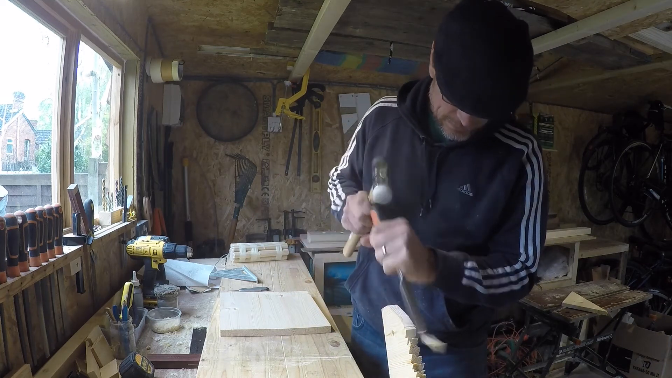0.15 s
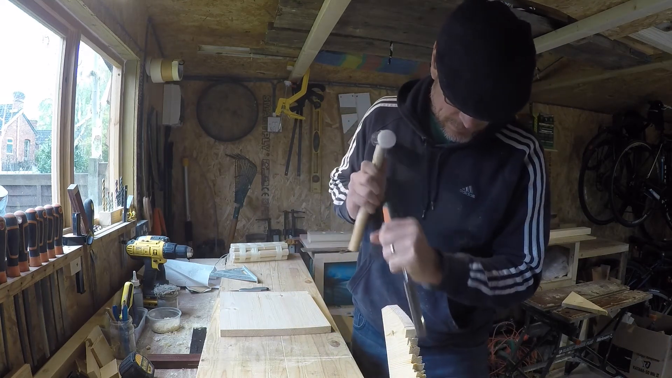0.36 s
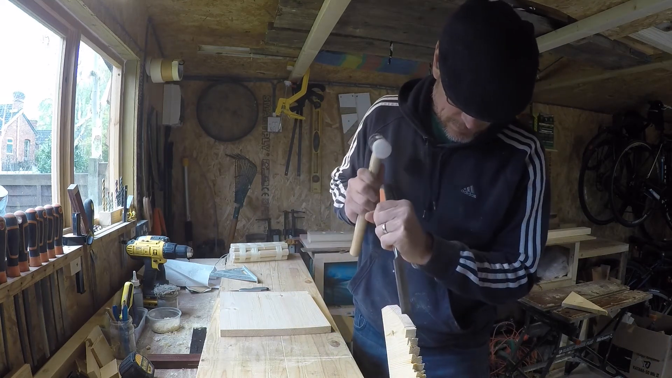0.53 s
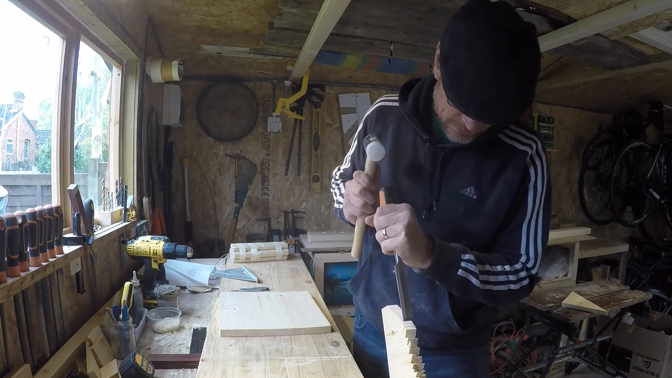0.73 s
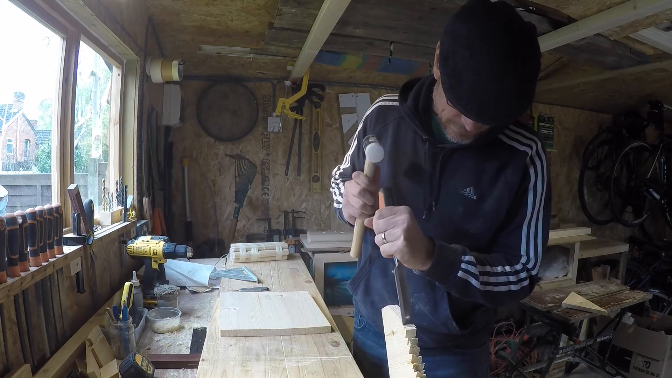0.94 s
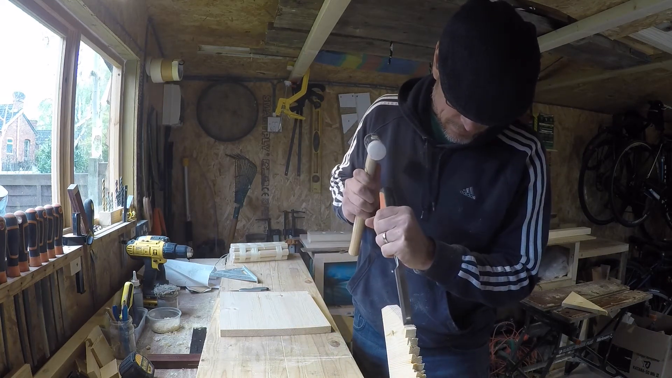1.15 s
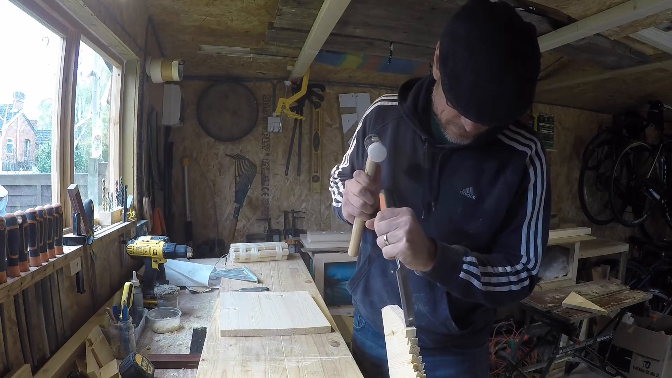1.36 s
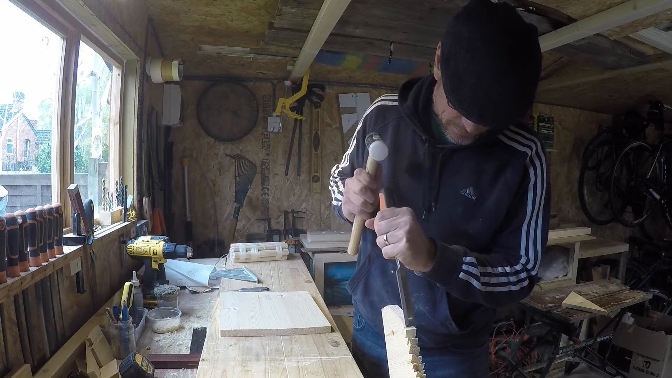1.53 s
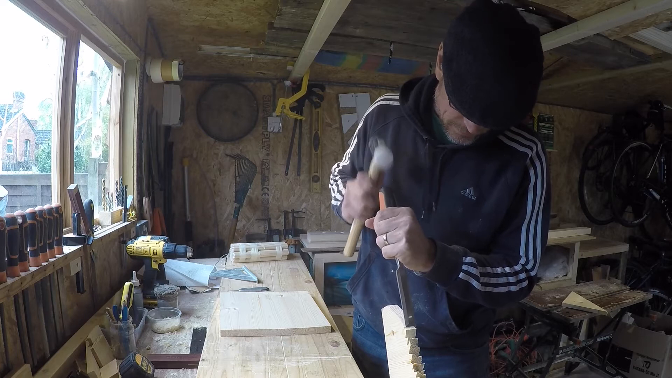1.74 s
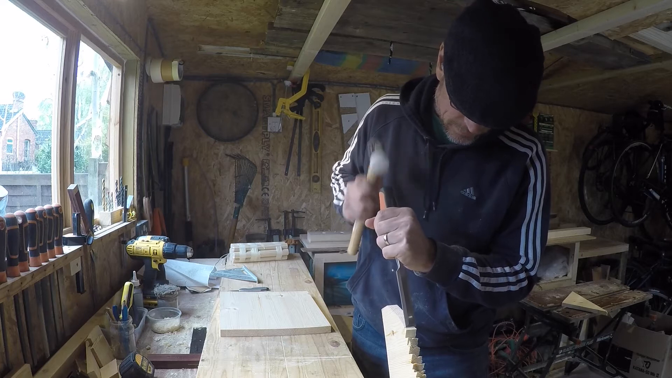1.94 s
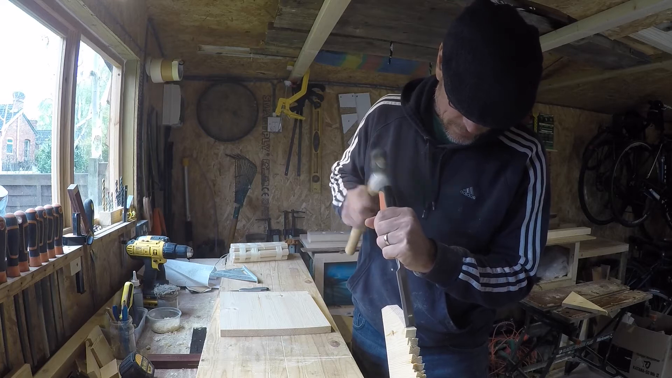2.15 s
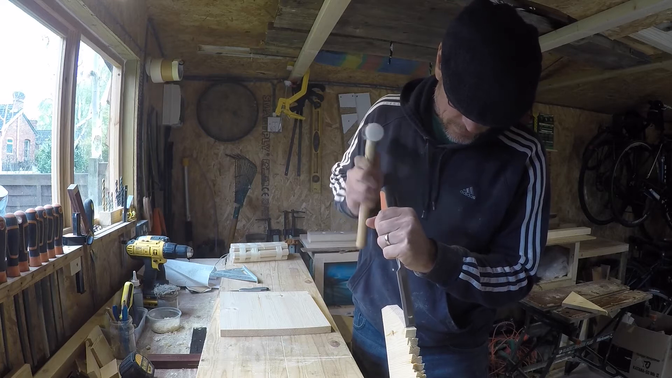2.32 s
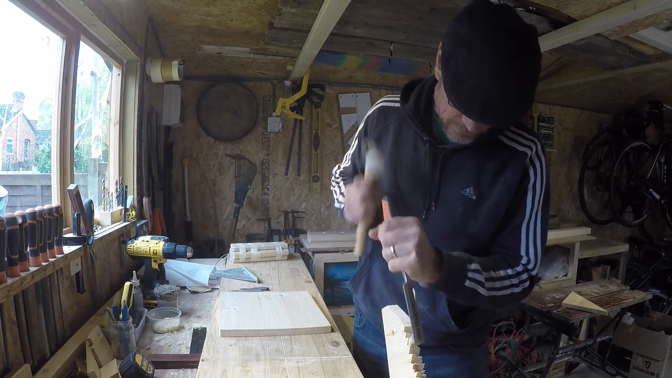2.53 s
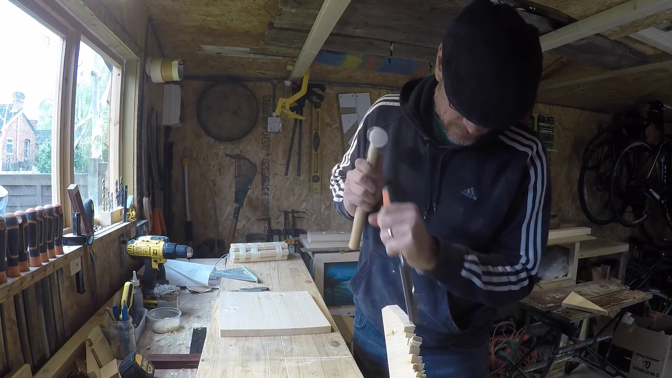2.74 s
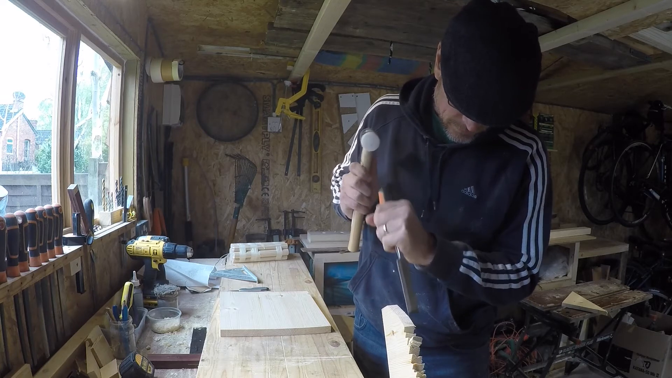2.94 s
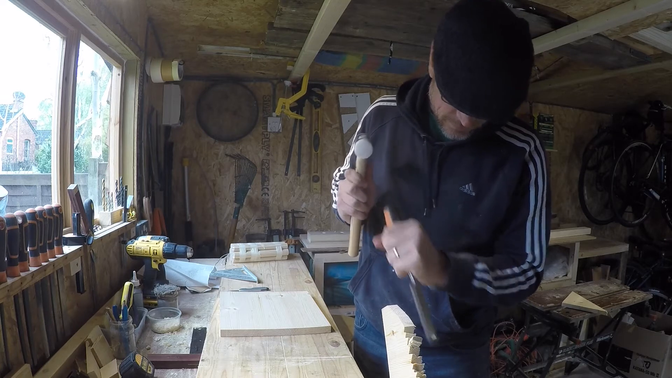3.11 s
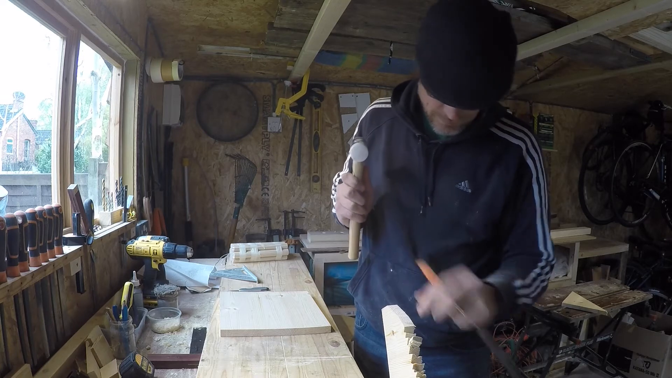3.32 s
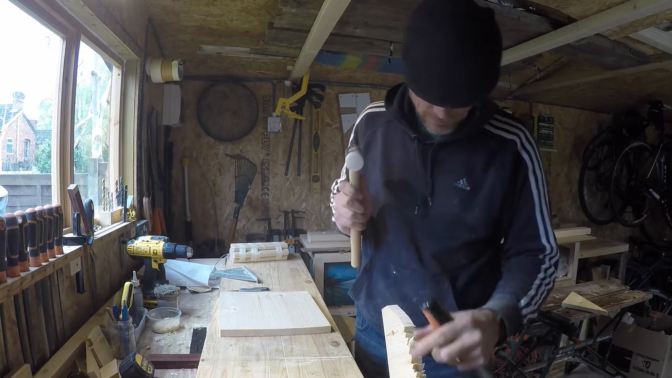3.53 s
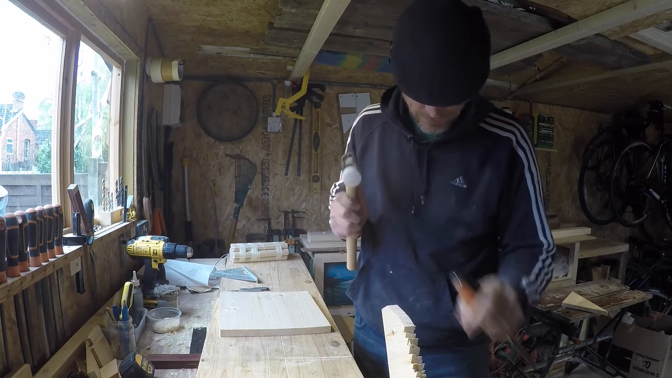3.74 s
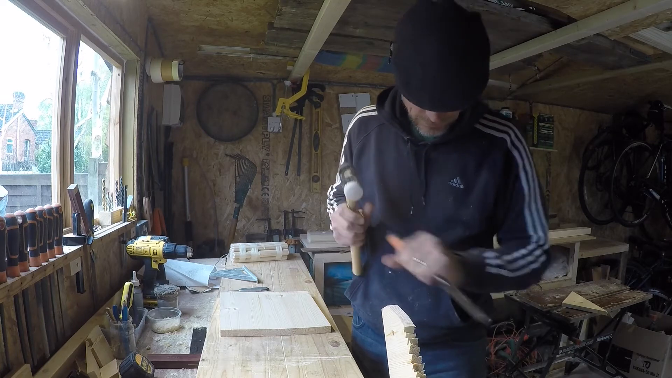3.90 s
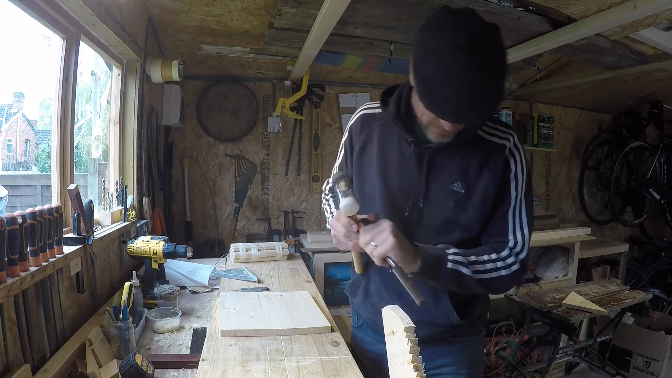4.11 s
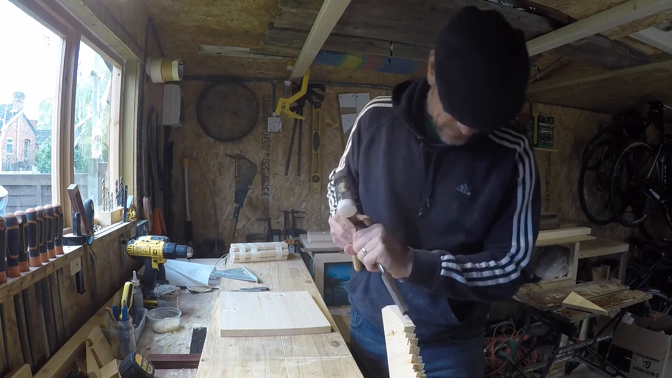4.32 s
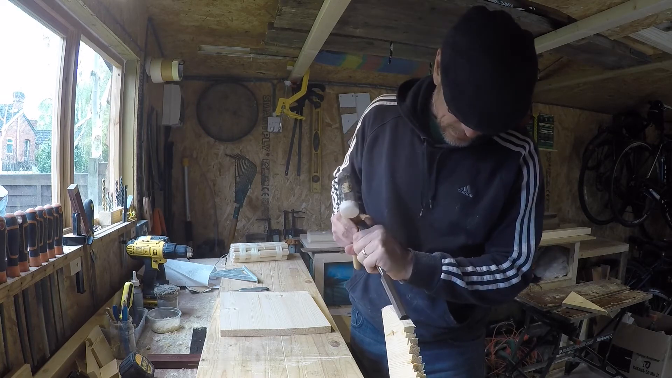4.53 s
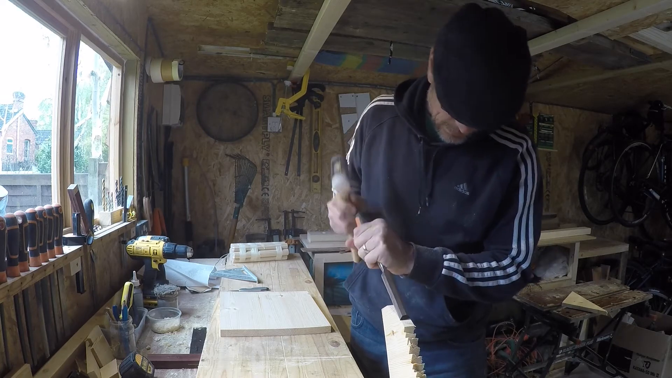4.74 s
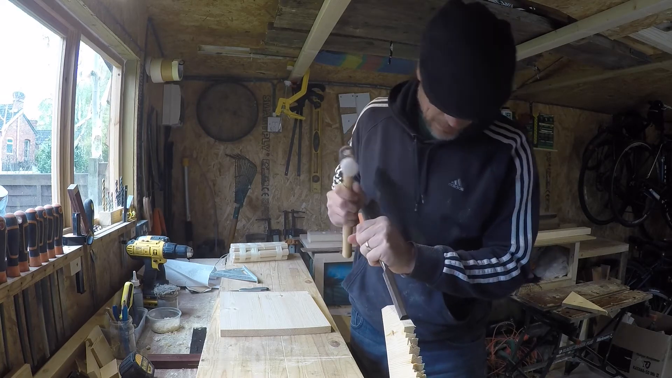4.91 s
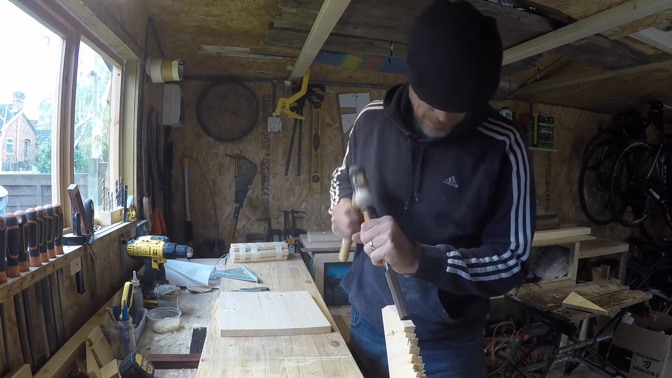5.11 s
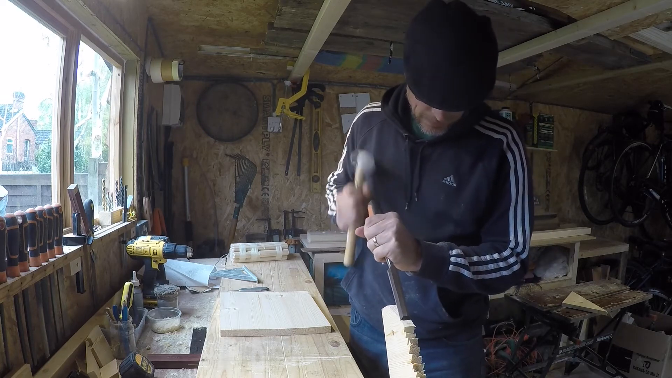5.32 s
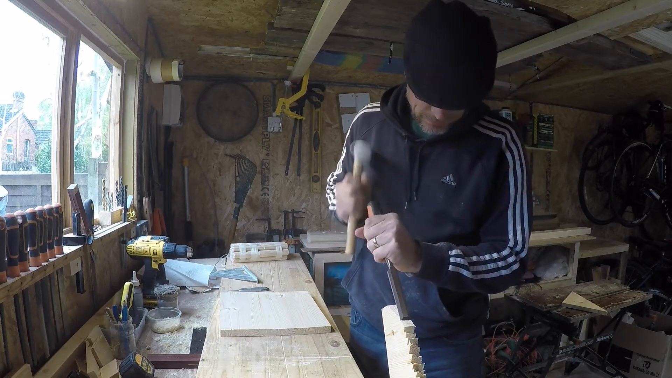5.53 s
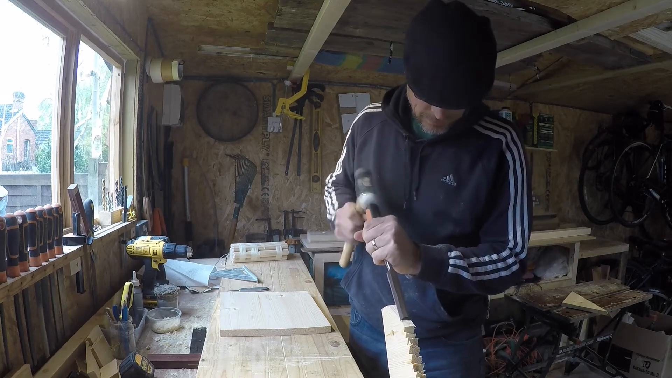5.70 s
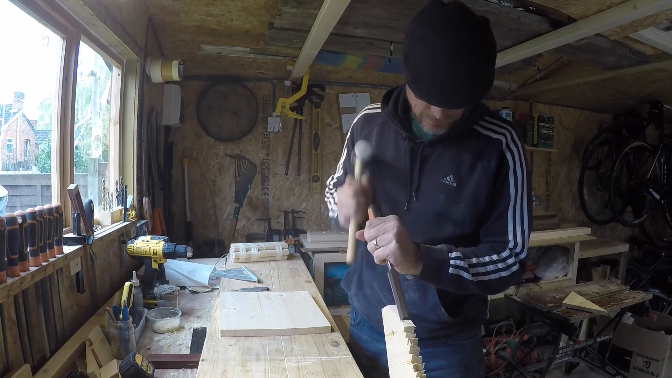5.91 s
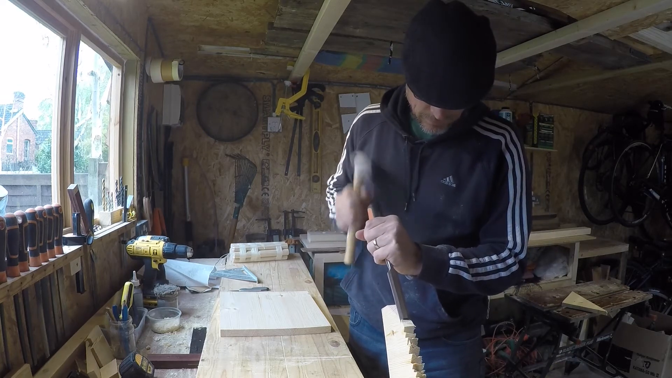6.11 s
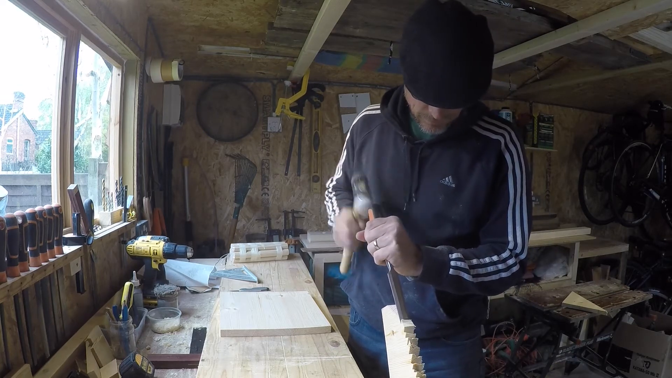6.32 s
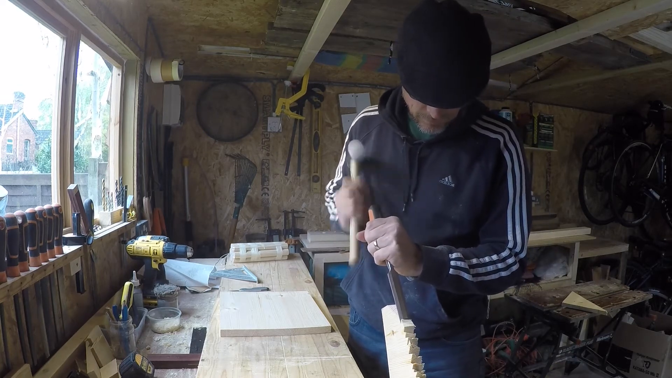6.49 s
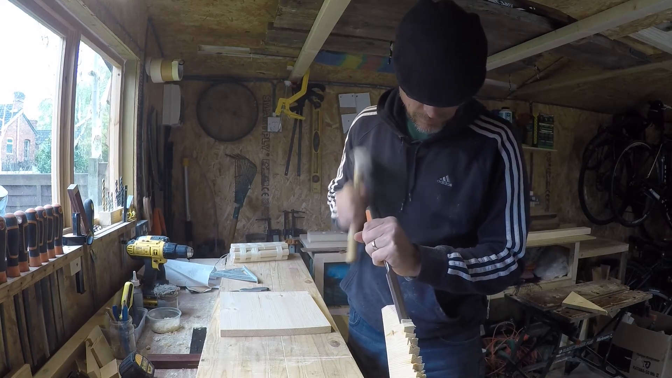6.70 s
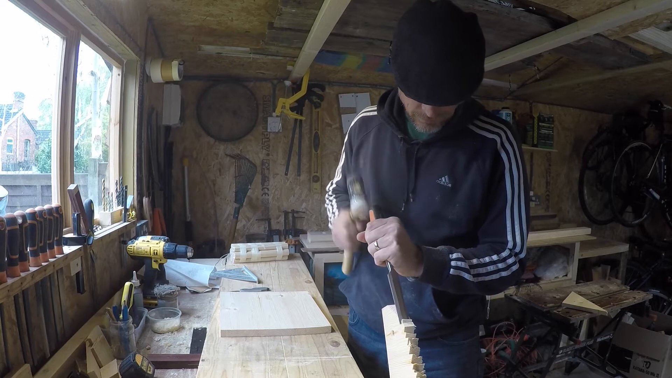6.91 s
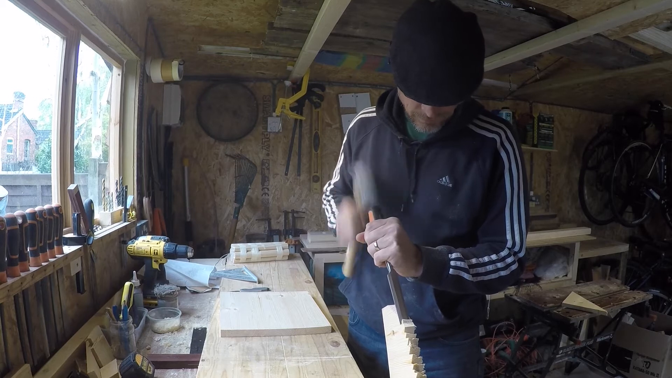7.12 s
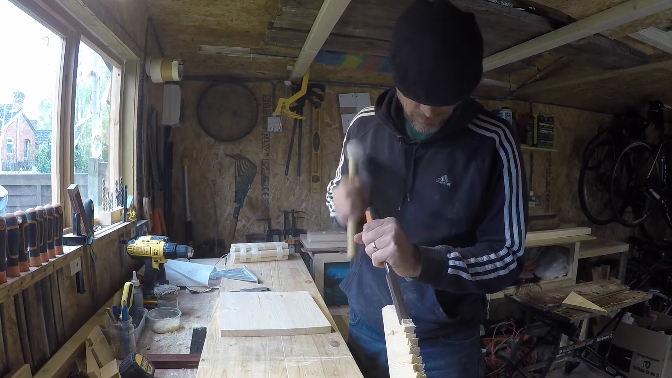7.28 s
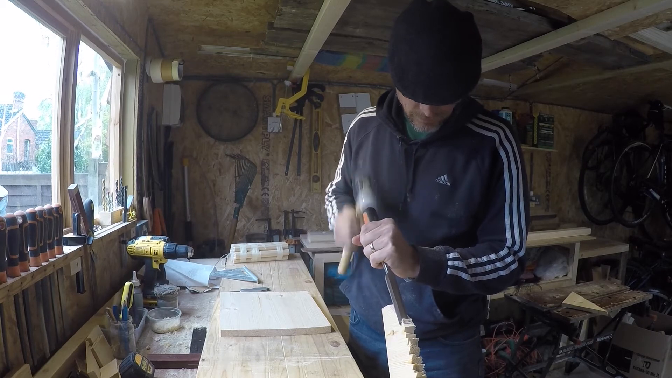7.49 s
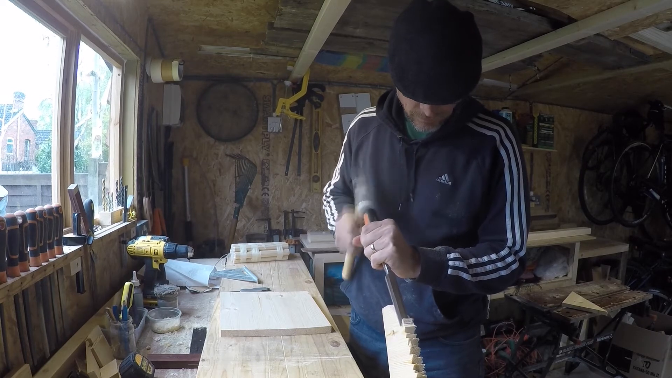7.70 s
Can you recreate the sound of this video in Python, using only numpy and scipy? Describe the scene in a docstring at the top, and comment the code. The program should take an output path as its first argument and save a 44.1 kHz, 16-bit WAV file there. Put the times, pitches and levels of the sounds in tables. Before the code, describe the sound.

Close mono sound of chiselling in a small shed. One hard crack comes early, followed by small clattering taps, then three blows in quick succession, the first softer. After a gap of quiet tool handling and soft knocks, a soft blow starts an even, brisk run of hard blows with woody body and bench thump. Thin steel ringing appears between later blows. Faint hum-like rumble and hiss throughout; loud peaks are slightly squashed.

```python
"""In a small timber shed, a hammer drives a wood chisel into a board held at a bench.
Each blow is a crack of noise that rings the chisel, plus slower sines for the board and the bench thump.
Light knocks are small clattering bursts, and a loose steel tool jingles as thin, damped sines.
Filtered noise makes the low rumble and hiss. Loud blows duck the gain and overload."""
import sys
import numpy as np
from scipy import signal
from scipy.fft import rfft, irfft
from scipy.io import wavfile

SR = 44100
rng = np.random.default_rng(int(sys.argv[2]) if len(sys.argv) > 2 else 0)


def log_audio(samples):
    """Write samples as a 16-bit WAV file to the path given in sys.argv[1]."""
    # one column per channel
    frames = np.atleast_2d(samples).T
    # limit to full scale, then quantise
    limited = np.clip(frames, -1, 1)
    pcm = np.round(limited * 32767).astype(np.int16)
    wavfile.write(sys.argv[1], SR, pcm)


N = 341775  # length in samples

# hammer blows: (start_s, crack_db, board_db, treble_db, chisel_ring_db, favoured_pitch_hz set by the grip)
HAMMER_BLOWS = [(0.135, -4, -13.5, -3.5, -41.5, 900), (1.83, -15, -38.5, -2.5, -36, 1160),
                (2.154, -5.5, -33.5, -2, -38.5, 1000), (2.438, -4.5, -32.5, 0.5, -38, 1500),
                (5.085, -19, -36, -11.5, -41.5, 710), (5.417, -7, -16.5, -6.5, -36.5, 912),
                (5.71, -5, -11.5, -5, -35, 1720), (6.014, -4.5, -10, -5, -41, 3500),
                (6.303, -4.5, -13.5, -4.5, -41, 1660), (6.588, -4, -8.5, -3, -43.5, 1660),
                (6.872, -5, -11.5, -4.5, -36, 1660), (7.162, -5, -10.5, -6, -47, 3500),
                (7.446, -4.5, -8, -8, -39.5, 600), (7.73, -4.5, -19, -5.5, -36.5, 600)]
# colour of the crack, before each blow's treble: (pitch_hz, level_db per Hz)
CRACK_COLOUR = [(90, -21.5), (150, -12.5), (330, -3), (600, -8), (1500, -10), (2200, -17.5), (3500, -14.5),
                (5000, -21.5), (8000, -28.5), (12000, -30), (14800, -40), (16000, -58.5)]
# ringing pitches of the board: (pitch_hz, relative_level_db, time_to_fall_60_db_s, rise_s, delay_s)
BOARD_MODES = [(307.2, 4.5, 0.14, 0.012, 0.0019), (333, -18.5, 0.2, 0.015, 0.0025),
               (404, -15.5, 0.13, 0.022, 0.0011)]
# ringing pitches of the bench, also used by the knocks: same columns as the board
BENCH_MODES = [(29, -4.5, 0.076, 0.03, 0.032), (41, -7.5, 0.78, 0.012, 0.018),
               (47, -13.5, 0.78, 0.015, 0.018), (55.6, 3.5, 0.18, 0.0071, .0195),
               (71.84, -5, 0.54, 0.0075, .0215), (83.2, -13.5, 0.45, 0.013, .02),
               (91, -13.5, 0.41, 0.0082, 0.013), (109.4, -9.5, 0.45, 0.0039, .012),
               (137, -10, 0.37, .012, 0.0087), (157, -8.5, 0.21, 0.0041, 0.0065)]
THUMP_DB, THUMP_PER_DB = -6, 0.8  # bench level at a 0 dB crack, and its change per dB of crack


def hammer():
    """Blows land on the same spot, so part of their echo pattern repeats."""
    out = np.zeros(N)
    same = rng.standard_normal(SR // 2)
    for start_s, crack_db, board_db, treble_db, ring_db, grip_hz in HAMMER_BLOWS:
        def colour(hz):
            # a squarer blow brings more treble
            return read(CRACK_COLOUR, hz) + read([(1500, 0.013), (10000, treble_db)], hz)

        noise = .5 * same + 1.1 * rng.standard_normal(SR // 2)
        echoes = burst(noise, colour, early_db=0, early_t60=0.056, rise=0.000052)
        crack = evened(struck(echoes, ring_db, grip_hz, spread_db=1.5), count=500)
        board = shaken(BOARD_MODES, spread=.008)
        thump = gain_of(THUMP_DB + THUMP_PER_DB * crack_db) * shaken(BENCH_MODES, spread=.025)
        # minus: the bench first moves away from the listener
        add(out, start_s, gain_of(crack_db) * crack + gain_of(board_db) * board - thump)
    return out


# ringing pitches of the chisel in the wood: (pitch_hz, level_db, time_to_fall_60_db_s)
CHISEL_MODES = [(420, -5, .06), (497, -2, .085), (604, -3, .07), (740, -6, .09), (795, -8, .05),
                (953, -3, .11), (1050, -7, .05), (1120, -5, .06), (1250, -7, .04), (1430, -8, .04),
                (1660, 0, .06), (1790, -5, .07), (1900, -6, .035), (2325, -5, .035), (2780, -6, .03),
                (3100, -4, .03), (3380, -5, .045), (3530, -3, .075), (3670, -6, .06), (3750, -7, .03),
                (4150, -6, .025), (4800, -7, .03), (5620, -5, .025)]
GRIP_DB_PER_OCTAVE = 7  # modes fade away from the favoured one


def struck(echoes, ring_db, favoured_hz, spread_db):
    """The steel click plus the modes it rings, all heard through the echoes of the shed."""
    chance = rng.standard_normal((len(CHISEL_MODES), 2))
    modes = []
    for (hz, db, t60), (pitch_chance, level_chance) in zip(CHISEL_MODES, chance):
        grip_loss_db = GRIP_DB_PER_OCTAVE * abs(np.log2(hz / favoured_hz))
        level_db = db + spread_db * level_chance - grip_loss_db
        modes.append((hz * (1 + 0.0089 * pitch_chance), level_db, t60, 1e-4, 0))
    source = gain_of(ring_db) * ring(modes)
    source[0] = 1  # the click
    return signal.fftconvolve(echoes, source[:6000])[:SR // 2]


def shaken(modes, spread):
    """Modes whose pitches vary a little at random from blow to blow."""
    shift = 1 + spread * rng.standard_normal(len(modes))
    shifted = [(hz * factor, *rest) for (hz, *rest), factor in zip(modes, shift)]
    return evened(ring(shifted), count=2500)


def ring(modes):
    """Sines that swell in after their delay, then die away as the vibration loses energy."""
    t = np.arange(SR // 2) / SR
    out = np.zeros(len(t))
    for hz, db, t60, rise, delay in modes:
        since_s = np.maximum(t - delay, 0)
        swell = 1 - np.exp(-(since_s / rise) ** 2)
        out += gain_of(db - 60 * since_s / t60) * swell * np.sin(2 * np.pi * hz * since_s)
    return out


# how long echoes last in the shed: (pitch_hz, time_to_fall_60_db_s)
SHED_ECHO = [(150, 0.39), (400, 0.27), (900, 0.25), (2000, 0.27), (4000, 0.26), (7000, 0.21), (14000, 0.26)]
# how slowly sound gathers after a blow, slowest in the bass: (pitch_hz, rise_s)
BASS_BLOOM = [(200, 0.036), (600, 0.0017), (1200, 0.0008), (3000, 0.00012)]
# how far the first dense burst stands over the later echoes: (pitch_hz, level_db)
FIRST_BURST = [(300, 7), (800, 0.5), (1600, 9.5), (5000, 12), (14000, 14.5)]


def burst(noise, colour, early_db, early_t60, rise, decay=1, bloom=1):
    """A dense early burst of noise, then the shed's decay band by band, with the bass gathering slowest."""
    hz, t, bands = signal.stft(noise, SR, nperseg=256, noverlap=192)
    echo = gain_of(-60 * t / decay / read(SHED_ECHO, hz)[:, None])
    gather = 1 - np.exp(-(t + 0.003) / bloom / read(BASS_BLOOM, hz)[:, None])
    early = gain_of(early_db + read(FIRST_BURST, hz)[:, None] - 60 * t / early_t60)
    shaped = bands * echo * gather * (1 + early) * gain_of(colour(hz))[:, None]
    x = signal.istft(shaped, SR, nperseg=256, noverlap=192)[1][:len(noise)]
    return x * (1 - np.exp(-np.arange(len(x)) / SR / rise))


# light knocks of chisel, waste and hands:
# (start_s, level_db, strongest_pitch_hz, fall_above_db per octave, rise_s, echo_length as a factor)
LIGHT_KNOCKS = [(0.277, -48, 8600, 8, .001, .35), (0.61, -23, 2470, 14.5, 0.0011, 0.99),
                (0.653, -27, 1400, 15, 0.00064, 0.76), (.717, -40, 8900, -0.5, 0.0037, 0.7),
                (.734, -28.5, 3750, 15, 0.0011, 0.78), (0.851, -48, 910, 7.5, .0015, .79),
                (0.905, -54.5, 3930, 10.5, .002, .51), (0.961, -45, 620, 14, 0.0011, .35),
                (.983, -41, 270, 20, 0.0034, 0.55), (1.343, -58.5, 2500, 17.6, .0016, .48),
                (1.355, -41, 277, 23, 0.0033, 0.51), (3.619, -43, 4700, 20, .00087, 0.47),
                (3.653, -47, 1520, 9.5, 0.0015, 0.82), (3.822, -55, 1270, 12.5, .0016, 0.4),
                (4.029, -56, 1520, 8.5, 0.013, .58), (4.124, -45.5, 2320, 12, 0.014, 1.45),
                (4.161, -25, 2600, 11.5, 0.0073, 0.81), (4.383, -31.5, 1970, 14.5, 0.0052, 0.78),
                (4.604, -41.5, 1950, 19, 0.0039, 0.74), (4.603, -51, 4900, 17, .0016, 1.1),
                (4.797, -62, 11060, 1, .001, 0.26), (4.878, -54, 2100, 9.5, .004, 1.1),
                (4.954, -58.5, 3540, 22.5, .0018, .98)]
# how a knock falls away under its strongest pitch: (strongest_pitch_hz, fall_below_db per octave)
FALL_BELOW = [(270, 13), (700, 0), (2500, 3.5), (5000, 5.5), (10000, -6)]
# low thuds: the dying thump of an earlier blow at the start, then a dull bump at 4.1 s: (start_s, level_db)
LOW_THUDS = [(.012, -26.5), (4.108, -27)]
KNOCK_THUMP_DB = -19.5  # bench thump under a knock
THUD_HZ, THUD_RISE_S, THUD_TAP_DB = 131.6, 0.013, -18.5  # the soft tap within a low thud


def knocks():
    """Taps that stir the bench a little, and low thuds made mostly of the bench's ringing pitches."""
    out = np.zeros(N)
    bench = evened(ring(BENCH_MODES), count=2500)
    for start_s, level_db, hz, above, rise, decay in LIGHT_KNOCKS:
        knock = tap(hz, read(FALL_BELOW, hz), above, rise, decay)
        add(out, start_s, gain_of(level_db) * (knock - gain_of(KNOCK_THUMP_DB) * bench))
    for start_s, level_db in LOW_THUDS:
        soft_tap = tap(THUD_HZ, below=6, above=8, rise=THUD_RISE_S, decay=.7)
        add(out, start_s, gain_of(level_db) * (gain_of(THUD_TAP_DB) * soft_tap - bench))
    return out


CLATTER_DB, CLATTER_S = 3.5, .002  # a knock is a cluster of small contacts: spread and spacing


def tap(centre_hz, below, above, rise, decay):
    """A small clattering tap with one broad resonance, peaked by a short ring."""
    def colour(hz):
        octaves = np.log2((hz + 40) / centre_hz)
        slopes = np.minimum(below * octaves, -above * octaves)
        return slopes + 2.1 * np.exp(-(octaves / 0.13) ** 2)

    edges = np.arange(0, .5 + CLATTER_S, CLATTER_S)
    contacts = rng.standard_normal(len(edges)) * np.exp(-edges / .03)
    lumps = np.interp(np.arange(SR // 2) / SR, edges, contacts)
    noise = rng.standard_normal(SR // 2) * gain_of(CLATTER_DB * lumps)
    echoes = burst(noise, colour, early_db=-8.0, early_t60=0.012, rise=rise, decay=decay, bloom=.3)
    return evened(struck(echoes, -47.0, centre_hz, spread_db=1.4), count=600)


# jolts of the loose steel tool: (start_s, level_db, extra_level_of_lowest_pitch_db)
TOOL_JOLTS = [(5.83, -60, -2), (6.12, -62, -2), (6.38, -51, -12), (6.68, -57, -1), (6.955, -35, -24),
              (7.115, -53, -6), (7.3, -64, 13), (7.55, -64, 13)]
# ringing pitches of the tool: (pitch_hz, level_db, time_to_fall_60_db_s, share_damped on settling, 0 to 1)
TOOL_MODES = [(905, 0, .9, 0), (1772, 1, .55, .8), (2742, -11, .7, .1), (3548, -16, .6, .8),
              (3925, -18, .7, .3), (4385, -16, .6, .7), (4950, -28, .9, .5), (5370, -24, .6, 1),
              (5460, -19, .8, 1)]
SETTLE_S = .115  # free ring before the tool settles


def loose_tool():
    """Thin steel rings that swell after a jolt and are damped as the tool settles."""
    out = np.zeros(N)
    settled_s = np.maximum(np.arange(SR // 2) / SR - SETTLE_S, 0)
    for start_s, level_db, low_db in TOOL_JOLTS:
        for k, (hz, db, t60, damped) in enumerate(TOOL_MODES):
            extra_db = low_db if k == 0 else 0
            mode = ring([(hz, db + extra_db, t60, .025, 0)])
            damping_db = 900 * damped * settled_s  # 900 dB a second at full share
            add(out, start_s, gain_of(level_db - damping_db) * mode)
    return out


# colour of the rumble and hiss together: (pitch_hz, relative_level_db per Hz)
BACKGROUND_COLOUR = [(15, -16), (30, -9.5), (40, -9.5), (50, 7.5), (60, -16.5), (80, -12.5), (140, -25),
                     (185, -33.5), (450, -37.5), (900, -38), (1700, -46.5), (5000, -51.5), (15500, -63.5)]
# slow drift of the whole background: (time_s, level_db)
BACKGROUND_LEVEL = [(0.0, -37), (7.75, -38.5)]


def background():
    """Random noise shaped into a hiss over a low rumble, drifting slowly in level."""
    hz = np.fft.rfftfreq(N, 1 / SR)
    noise = irfft(rfft(rng.standard_normal(N)) * gain_of(read(BACKGROUND_COLOUR, hz)), N)
    level_db = np.interp(np.arange(N) / SR, *np.transpose(BACKGROUND_LEVEL))
    return noise / noise.std() * gain_of(level_db)


def gain_of(db):
    """Turns decibels into a multiplier for the waveform."""
    return 10 ** (np.asarray(db) / 20)


def read(points, hz):
    """Reads a table between its points, on a pitch-like (logarithmic) scale."""
    f, value = np.transpose(points)
    return np.interp(np.log(hz + 1), np.log(f + 1), value)


def add(mix, start_s, sound):
    """Adds a sound to the mix at its start time, cut at the end of the mix."""
    part = mix[round(start_s * SR):][:len(sound)]
    part += sound[:len(part)]


def evened(x, count):
    """Gives the first samples an average strength (rms) of 1."""
    return x / np.sqrt(np.mean(x[:count] ** 2))


def scene():
    """All the sounds heard together, in one channel."""
    return (hammer() + knocks() + loose_tool() + background())[None]


def record(dry):
    """Gain control ducks after loud blows, peaks saturate, and the top treble is cut off."""
    power_db = 10 * np.log10(signal.lfilter([.01], [1, -.99], dry[0] ** 2) + 1e-12)
    fall_db = np.arange(N) * 4.8 / SR  # recovery of 4.8 dB a second in the held level
    held_db = np.maximum.accumulate(power_db + fall_db) - fall_db
    over_db = np.maximum(held_db + 20.0, 0)  # above -20 dB
    ducked = dry / gain_of(0.2 * over_db)
    clipped = ducked / (1 + (ducked / .93) ** 4) ** .25  # rounds peaks off towards .93
    dulled = signal.sosfilt(signal.butter(10, 15000, fs=SR, output="sos"), clipped)
    band_limit = signal.firwin(511, 16400, window=("kaiser", 9), fs=SR)
    return signal.oaconvolve(dulled, band_limit[None], "same")


dry = scene()
out = record(dry)
log_audio(out)
```